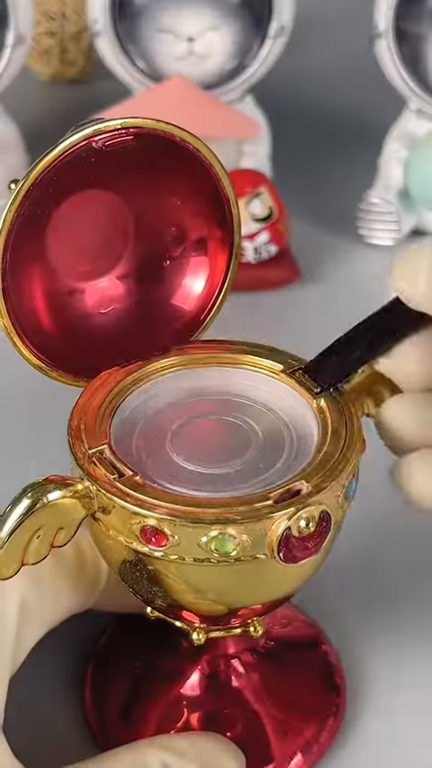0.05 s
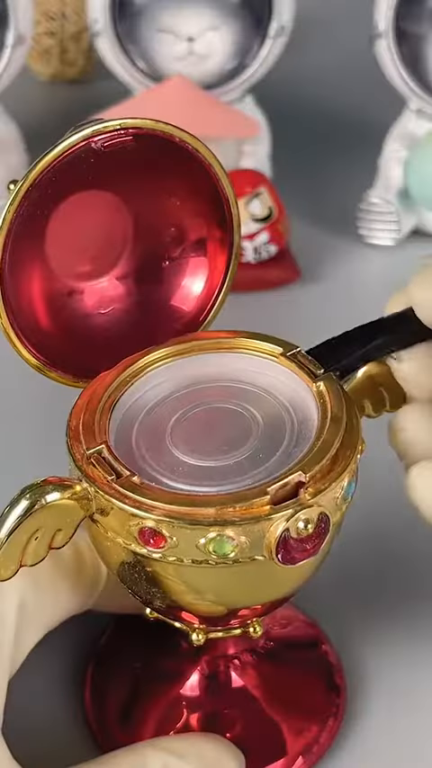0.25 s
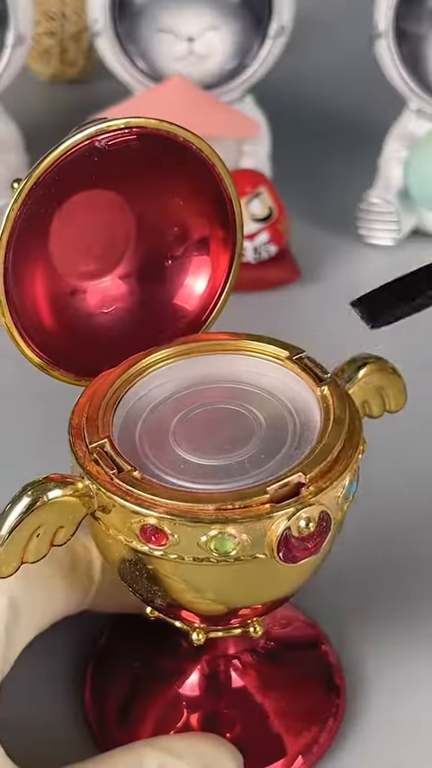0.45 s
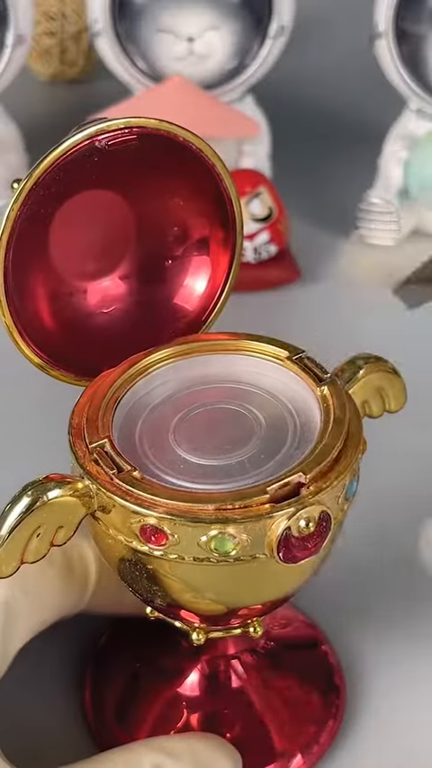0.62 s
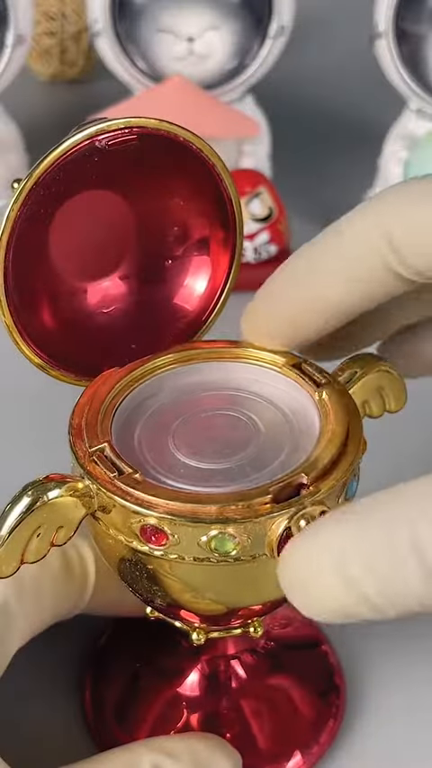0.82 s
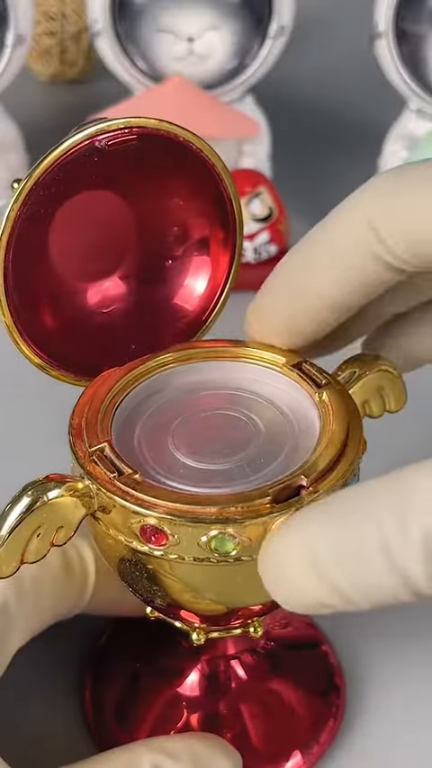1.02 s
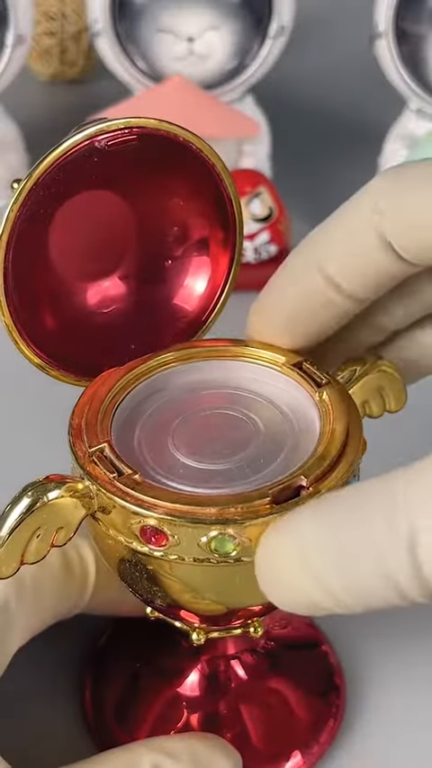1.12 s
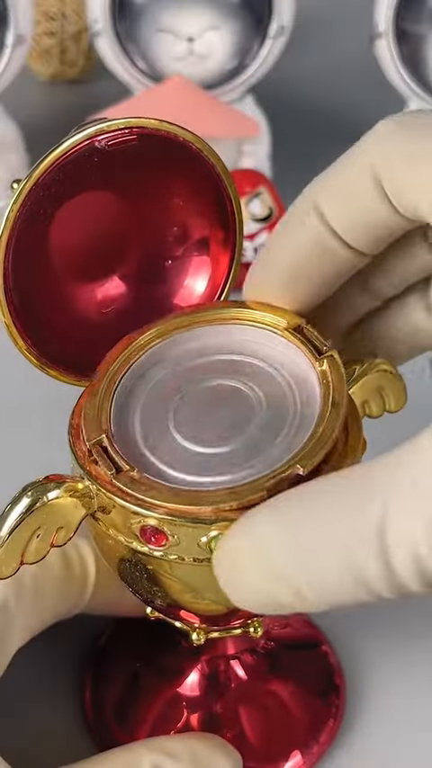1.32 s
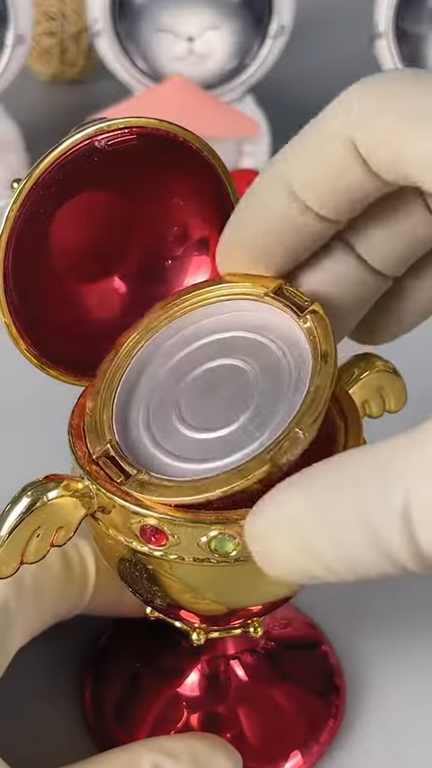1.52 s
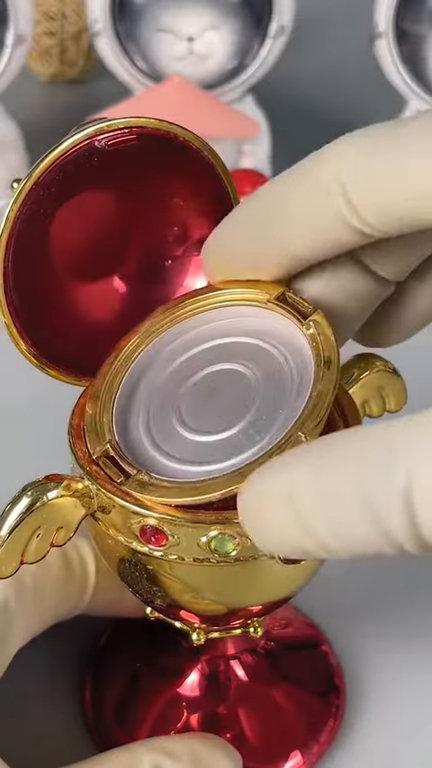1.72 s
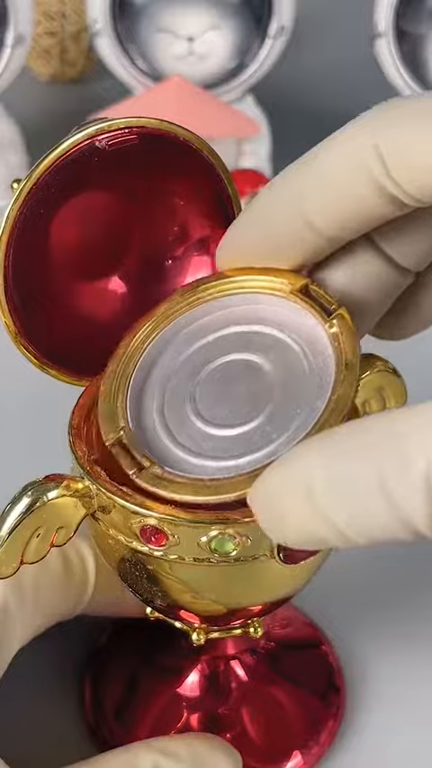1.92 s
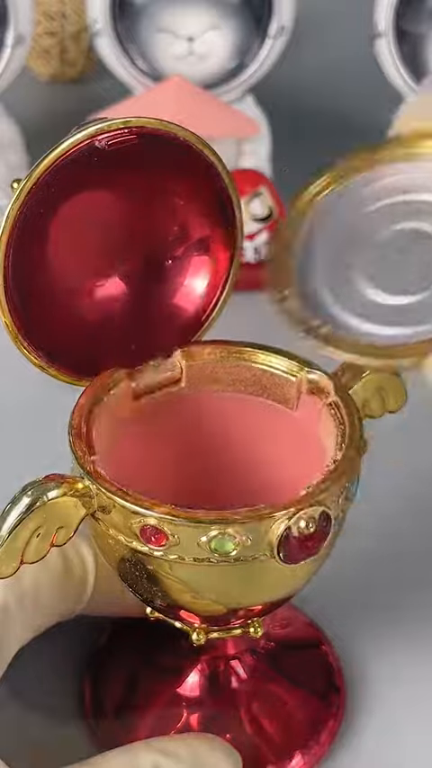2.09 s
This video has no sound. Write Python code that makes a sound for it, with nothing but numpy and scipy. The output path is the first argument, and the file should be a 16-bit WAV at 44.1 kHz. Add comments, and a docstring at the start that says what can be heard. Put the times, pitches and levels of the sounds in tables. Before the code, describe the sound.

A metal makeup case clicks close to the microphone, its inner pan snapping twice against the rim with a brief ring. Softer ticks and tiny scrapes follow, in a slightly echoing room with a low hum.

```python
"""First you hear a room rumbling, then a small metal compact being handled close by.
A tool prises at its inner pan, which snaps twice against the rim; gloved fingers then lift the pan
out with light ticks. Each touch makes the metal ring briefly, dragging makes it scrape, and the
room echoes both. Behind it a low hum comes and goes and a faint motor sings, stepping down in pitch.
Near the end a faint, very high whine joins the background."""
import sys
import numpy as np
from scipy import signal
from scipy.fft import rfft, irfft
from scipy.io import wavfile

SR = 44100
rng = np.random.default_rng(int(sys.argv[2]) if len(sys.argv) > 2 else 0)


def materialize(psi):
    """Save the field psi as 16-bit PCM at rate SR to the path in sys.argv[1].

    A 1-D psi becomes a single channel; in a 2-D psi each row is a channel.
    """
    bounded = np.clip(np.atleast_2d(psi).T, -1, 1)
    quanta = np.round(bounded * 32767).astype(np.int16)
    wavfile.write(sys.argv[1], SR, quanta)


N = 94815
TIME, FREQS = np.arange(N) / SR, np.fft.rfftfreq(N, 1 / SR)
LEFT_RIGHT = np.array([[1], [-1]])


def from_db(db):
    """Turn decibels into a number to multiply by."""
    return 10 ** (np.asarray(db) / 20)


def rms_one(x):
    """Scale a sound so its average strength (rms) is 1."""
    return x / np.sqrt(np.mean(x ** 2) + 1e-20)


def at_hz(table, hz, column=1):
    """Read between a table's rows on a log-frequency scale."""
    rows = np.array(table)
    return np.interp(np.log(hz + 0.0011), np.log(rows[:, 0]), rows[:, column])


def band_pass(x, band_hz):
    """Keep the sound between two frequencies."""
    return signal.sosfilt(signal.butter(2, band_hz, "band", fs=SR, output="sos"), x)


def drift(rate_hz):
    """A smooth random wobble, about 1 in size."""
    step, warm_up = 40, 2000
    pole = np.exp(-2 * np.pi * step * rate_hz / SR)
    white = rng.standard_normal(N // step + warm_up + 2)
    slow = signal.lfilter([1], [1, -2 * pole, pole * pole], white)[warm_up:]
    return np.interp(np.arange(N) / step, np.arange(len(slow)), rms_one(slow))


def stereo_white(side_db):
    """White noise; the lower side_db, the more alike left and right are."""
    mid, side = rng.standard_normal((2, N))
    return mid + from_db(side_db) * side * LEFT_RIGHT


def noise(colour, side_db):
    """Steady stereo noise, shaped by a table of levels from low to high pitch."""
    return rms_one(irfft(rfft(stereo_white(side_db)) * from_db(at_hz(colour, FREQS)), N))


def dying(fade_s):
    """A fade that falls 60 dB in fade_s seconds."""
    return np.exp(-np.log(1000) * TIME / fade_s) + 1e-18


def gate(start, end, ramp_s):
    """Fade in, hold, fade out."""
    return np.clip(np.minimum(TIME - start, end - TIME) / ramp_s + .5, 0, 1)


def tone(hz, waver_hz):
    """A plain tone whose pitch wanders."""
    pitch = hz + waver_hz * drift(3.66)
    return np.sqrt(2) * np.sin(2 * np.pi * np.cumsum(pitch) / SR)


# Colour (how strong each frequency is) of the room's low, middle and high noise: f/Hz, level/dB
RUMBLE_COLOUR = [(25, -78), (45, -4.5), (75, 2), (125, 8.5), (190, 1.5), (300, 0), (420, -1.5),
                 (600, -41.5)]
MIDS_COLOUR = [(250, -9.5), (400, 6), (550, 2.5), (750, -8), (1000, -28.5), (1500, -26.5), (2500, -42.5)]
HISS_COLOUR = [(600, 15), (1200, 4), (2200, -2.5), (3500, -2), (4800, -6.5), (6500, -20), (10000, -16),
               (13000, -11.5), (14500, -13), (16000, -17)]
# How loud the low and middle noise are over time: t/s, level/dB
RUMBLE_LEVEL = [(0, -46.5), (.65, -45.5), (1.0, -49), (1.5, -46.5), (1.85, -46.5), (2.15, -48)]
MIDS_LEVEL = [(0, -48.5), (.7, -50), (1.05, -53.5), (1.45, -53.5), (1.69, -49.5), (1.78, -61), (2.15, -66)]
def room_noise():
    """A deep rumble, a soft rush that sinks near the end, and a steady hiss."""
    mids_db = np.interp(TIME, *np.transpose(MIDS_LEVEL))
    rumble_db = np.interp(TIME, *np.transpose(RUMBLE_LEVEL))
    mids = from_db(mids_db) * noise(MIDS_COLOUR, side_db=-11)
    rumble = from_db(rumble_db) * noise(RUMBLE_COLOUR, side_db=-31.5)
    hiss = from_db(-62.5) * noise(HISS_COLOUR, side_db=-7)
    return rumble + mids + hiss


# Stretches of low hum: start t/s, end t/s, f/Hz, level/dB
HUMS = [(-.05, 0.136, 128, -45.5), (0.17, 0.766, 107, -48), (.5, 0.741, 151.7, -50),
        (1.001, 1.569, 145, -53), (1.642, 2.2, 106, -50)]
def hum():
    """Low, wavering tones come and go."""
    return sum(from_db(db) * gate(start, end, ramp_s=0.025) * tone(hz, waver_hz=3.3)
               for start, end, hz, db in HUMS)


# The motor's steady runs: start t/s, end t/s, tone f/Hz, tone level/dB, whine f/Hz, whine level/dB
MOTOR_RUNS = [(0.187, .58, 404.3, -53, 4370, -71), (0.874, 1.59, 384.4, -49, 4390, -78.5),
              (1.581, 2.2, 310, -48.5, 3480, -81.5)]
def motor():
    """A distant motor holds one speed after another: a plain tone with a thin whine above it."""
    flutter_db, whine_width_hz = 2.2, 300
    out = np.zeros(N)
    for start, end, hz, db, whine_hz, whine_db in MOTOR_RUNS:
        whine = rms_one(drift(whine_width_hz / 2) * np.sin(2 * np.pi * whine_hz * TIME))
        note = from_db(db + flutter_db * drift(34)) * tone(hz, waver_hz=1.5)
        out += gate(start, end, ramp_s=0.034) * (note + from_db(whine_db) * whine)
    return out


# The room's echo from low to high: f/Hz, level/dB, time to fade by 60 dB t/s
ECHO_BANDS = [(120, -29.5, 0.46), (390, -7, 0.46), (840, -6.5, 0.47), (1300, -5.5, 0.42), (1850, -12, 0.38),
              (2835, -11.5, 0.41), (4000, -13.5, .38), (5300, -11, .42), (6800, -18, .24),
              (7600, -12.5, .28), (9500, -11, 0.4), (12000, -13.5, 0.29), (15100, -20.5, .22)]
def room_echo(sound):
    """Sound bounces off hands and table, then dies away in the room, each band at its own speed."""
    side_db, bounce_db, bounce_rise_s, tail_rise_s = -13, -8, 0.0023, 0.002
    whites = [stereo_white(side_db), stereo_white(side_db)]
    bounce = dying(0.01) * np.minimum(TIME / bounce_rise_s, 1)
    echo = from_db(bounce_db) * stereo_white(side_db) * bounce / np.linalg.norm(bounce)
    rise = 1 - np.exp(-(TIME / tail_rise_s) ** 2)
    edges_hz = np.geomspace(100, 17000, 29)
    for k, band in enumerate(zip(edges_hz, edges_hz[1:])):
        hz = np.sqrt(band[0] * band[1])
        tail = rise * dying(at_hz(ECHO_BANDS, hz, column=2))
        hiss = band_pass(whites[k % 2], band)
        echo += from_db(at_hz(ECHO_BANDS, hz)) * hiss * tail / np.linalg.norm(tail)
    return signal.fftconvolve(sound[None], echo, axes=1)[:, :N]


# Short metal scrapes; the last row is a faint, very high background whine:
# middle t/s, length t/s, level/dB, squeak or whine f/Hz
SCRAPES_AND_WHINE = [(0.136, 0.038, -67, 5500), (0.211, .005, -41, 4000), (0.242, .03, -58.5, 5500),
                     (0.318, 0.02, -58, 4560), (0.382, 0.12, -58, 2853), (0.426, .005, -21, 5010),
                     (0.7, 0.033, -56, 3100), (0.835, .004, -27, 4530), (1.241, 0.039, -64, 4500),
                     (1.515, .008, -43, 5850), (1.55, 0.059, -57, 4700), (1.565, .007, -48, 4000),
                     (1.9, 0.39, -80.5, 12400)]
# Colour of the gritty noise they are made from: f/Hz, level/dB
GRIT_COLOUR = [(300, -8.5), (700, 12), (1300, 10.5), (2000, -12), (4500, -4), (8000, -4), (12000, -9.5),
               (15500, -1.5)]
def scrapes_and_whine():
    """Metal scrapes in tiny, uneven slips that stir up a squeak; the same grit makes the high whine."""
    slips_per_s, spread_db, peak_db, peak_width_hz = 14000, 1, 12, 740
    slips = (rng.random(N) < slips_per_s / SR) * rng.choice([-1, 1], N)
    strengths = from_db(-spread_db * rng.standard_normal(N))
    grit_spectrum = rfft(slips * strengths) * from_db(at_hz(GRIT_COLOUR, FREQS))
    out = np.zeros(N)
    for middle, length, db, peak_hz in SCRAPES_AND_WHINE:
        peak = 1 + from_db(peak_db) / (1 + 2j * (FREQS - peak_hz) / peak_width_hz)
        swell = np.exp(-2 * ((TIME - middle) / length) ** 2)
        out += from_db(db) * swell * rms_one(irfft(grit_spectrum * peak, N))
    return out


# The notes the case rings with: base f/Hz, level/dB within its part, time to fade by 60 dB t/s
CASE_NOTES = [(118.6, -1.5, 0.15), (205.2, 7.5, .03), (388, -8.5, 0.024), (626, 2, 0.0076),
              (758, 4, 0.0099), (987, -1.5, 0.038), (1040, -8, 0.0088), (1250, -8.5, 0.012),
              (1750, 4.5, 0.0066), (1720, 9, 0.024), (1930, -6, .018), (1990, -1.5, 0.025),
              (3274, 4, 0.0044), (3970, 3, .007), (4290, 14.5, 0.0041), (5036, 3, 0.013),
              (5330, -23, 0.018), (7360, -1, 0.0037), (9380, 2, 0.0041), (13000, -2.5, 0.0029),
              (14800, 1, 0.00079)]
# Metal touches metal: t/s, level/dB of five parts (thud, body, rim, pan, tick), pitch multiplier
CONTACTS = [(.208, -71, -47, -41.5, -46, -44, 0.95), (0.2108, -29.5, -32, -42.5, -43, -44.5, 0.77),
            (0.2176, -33, -39, -39.5, -52, -55, 1.01), (0.3046, -64, -34.5, -35.5, -55, -64, 1),
            (.322, -59, -52.5, -54.5, -47.5, -54.5, 0.85), (0.353, -79, -47, -46.5, -61, -66.5, 0.93),
            (0.3996, -58.5, -44.5, -39.5, -38.5, -54, 1.0), (0.4139, -59.5, -30, -35, -44, -66.5, 1.2),
            (0.4228, -55, -38, -26, -57, -49.5, 1.0), (0.4261, -49.5, -18, -19.5, -18.5, -25.5, 1.0),
            (.4283, -50, -25.5, -34.5, -36, -31, 1.0), (0.4312, -36.5, -20, -40.5, -23, -49, 1.0),
            (0.4645, -50.5, -25, -31.5, -32.5, -41, 1.0), (0.4671, -56.5, -28, -41, -51, -51.5, 1.5),
            (.809, -63, -37, -45.5, -39.5, -53, 1.12), (0.824, -57.5, -63.5, -28.5, -39, -49, 0.69),
            (0.8269, -52, -28.5, -17, -28.5, -44, 0.99), (0.8327, -53.5, -38.5, -26, -25, -41.5, 1.024),
            (.8329, -66.5, -30.5, -23.5, -28, -42, 0.8), (0.835, -62.5, -29.5, -39, -32, -35, 0.97),
            (0.8376, -53.5, -21.5, -38, -46, -55, 0.95), (1.239, -70.5, -52, -49, -71, -64, 0.93),
            (1.2968, -62.5, -44, -43, -38, -58, 0.787), (1.2998, -54, -56, -51, -52, -63, 1.22),
            (1.5605, -50, -32.5, -65, -41.5, -52.5, 0.9), (1.5649, -57, -36.5, -71, -57, -59, 1.05),
            (1.588, -52.5, -41, -71, -46.5, -63, 0.95), (1.5909, -64.5, -42.5, -67, -69, -70, 0.96),
            (1.67, -68.5, -59, -68, -57.5, -67, 0.61)]
def case_clicks():
    """Each touch rings five parts of the case; where it lands shifts their pitch, and they soon stop."""
    edges_hz = (70, 280, 1350, 2600, 6200, 17000)  # each part rings between two neighbouring edges
    t, attack_samples = TIME[:SR // 3], int(.004 * SR)
    note_hz = np.array(CASE_NOTES)[:, 0]
    part_of_note = np.searchsorted(edges_hz, note_hz) - 1
    fades = np.array([from_db(db) * dying(fade_s)[:len(t)] for _, db, fade_s in CASE_NOTES])
    tracks = np.zeros((len(edges_hz) - 1, N + SR))
    for when, *part_db, pitch_ratio in CONTACTS:
        start = int(when * SR)
        notes = fades * np.sin(2 * np.pi * pitch_ratio * note_hz[:, None] * t)
        for part, db in enumerate(part_db):
            ring = notes[part_of_note == part].sum(axis=0)
            attack_rms = np.sqrt(np.mean(ring[:attack_samples] ** 2) + 1e-20)
            tracks[part, start:start + len(t)] += from_db(db) * ring / attack_rms
    bands = zip(edges_hz, edges_hz[1:])
    return sum(band_pass(track[:N] + 1e-18, band) for track, band in zip(tracks, bands))


def scene():
    """The compact in the centre, with its echo and the background around it."""
    direct = case_clicks() + scrapes_and_whine()
    return direct + room_echo(direct) + motor() + hum() + room_noise()


# Boost or cut of the stereo width: f/Hz, level/dB
STEREO_WIDTH = [(60, -20.5), (140, -15), (300, -10.5), (600, -2.5), (1200, 9), (2400, 3.5), (4800, -9.5),
                (9000, 7.5), (14000, 9)]
# Boost or cut from the microphone: f/Hz, level/dB
MIC_COLOUR = [(40, -3), (70, 0), (900, 0.5), (1020, 0), (1250, -2.5), (1600, -2.5), (2050, 3), (2400, 0),
              (5500, 0), (5900, -3.5), (6400, -4.5), (7200, -2), (10000, -1), (11500, -3), (13000, 0),
              (15000, -3)]
def record(dry):
    """The microphone shapes the sound's colour and width, rounds its peaks and cuts the very top."""
    cutoff_hz = 15750
    mid = rfft(dry[0] + dry[1]) / 2
    side = rfft(dry[0] - dry[1]) / 2 * from_db(at_hz(STEREO_WIDTH, FREQS))
    coloured = irfft((mid + LEFT_RIGHT * side) * from_db(at_hz(MIC_COLOUR, FREQS)), N)
    top_cut = signal.ellip(10, .2, 80, cutoff_hz, fs=SR, output="sos")
    return signal.sosfilt(top_cut, np.tanh(coloured))


dry = scene()
out = record(dry)
materialize(out)
```